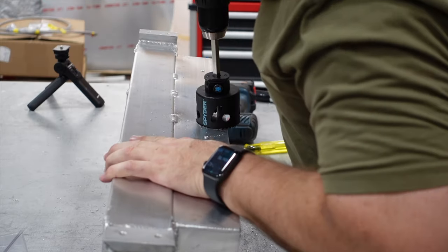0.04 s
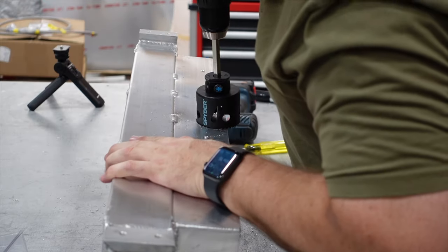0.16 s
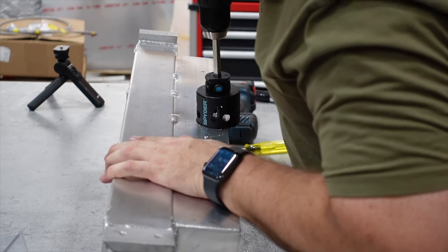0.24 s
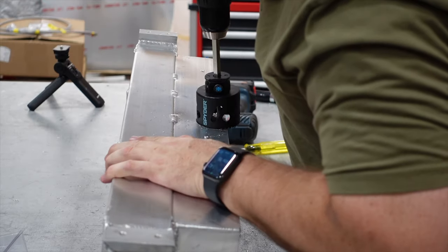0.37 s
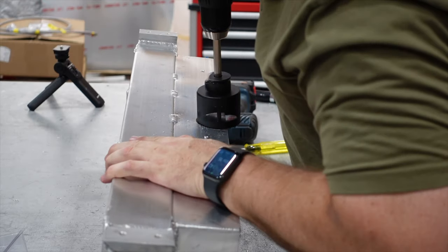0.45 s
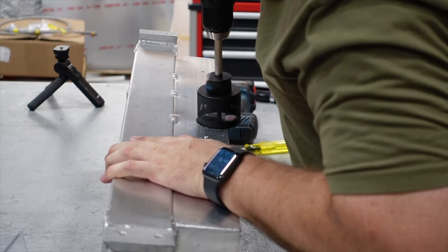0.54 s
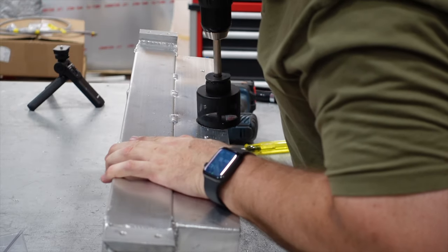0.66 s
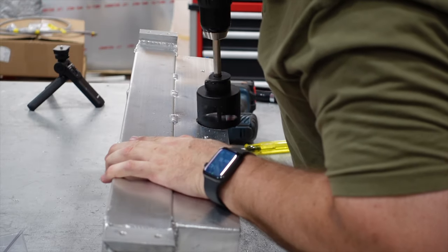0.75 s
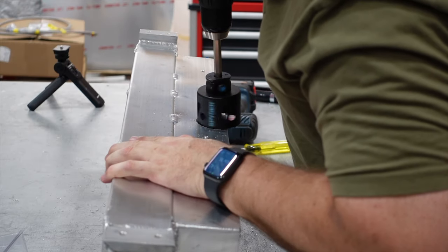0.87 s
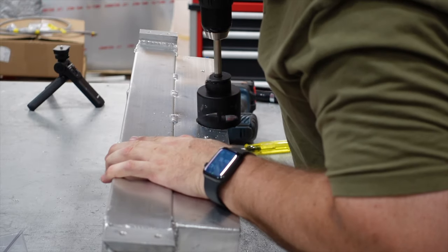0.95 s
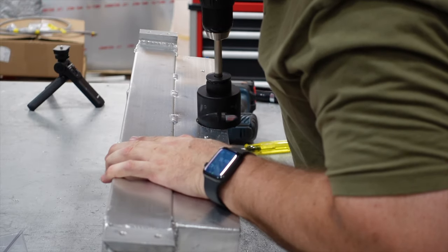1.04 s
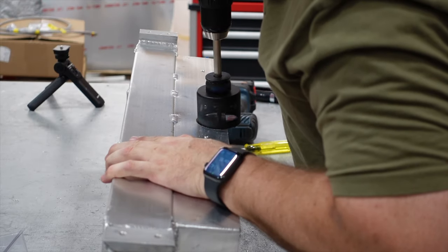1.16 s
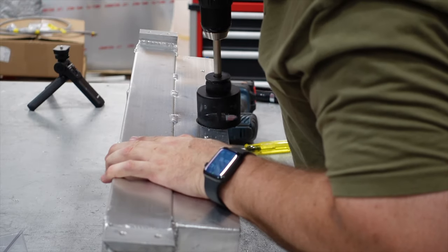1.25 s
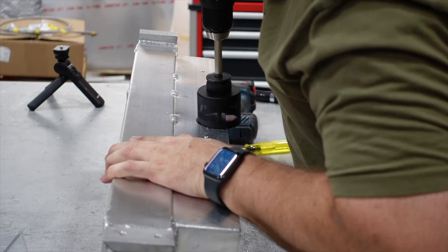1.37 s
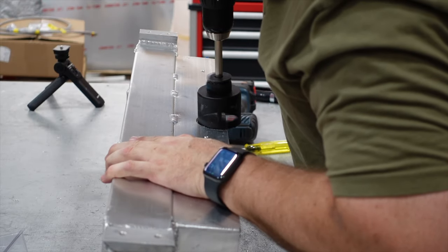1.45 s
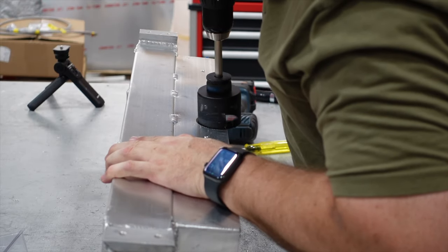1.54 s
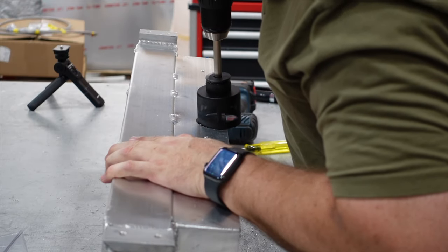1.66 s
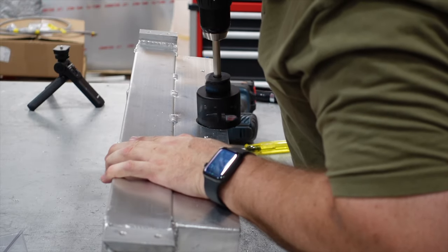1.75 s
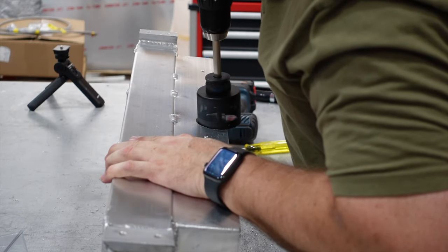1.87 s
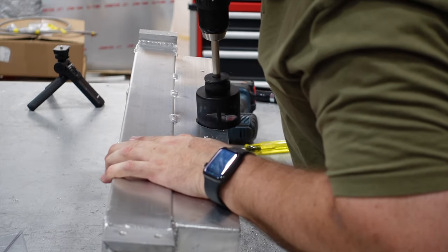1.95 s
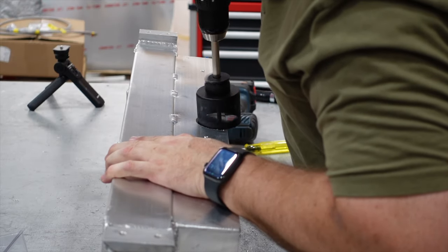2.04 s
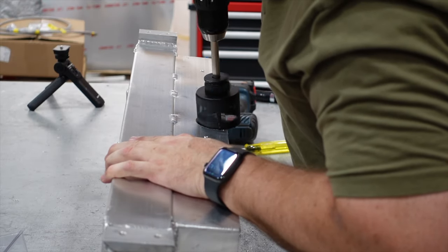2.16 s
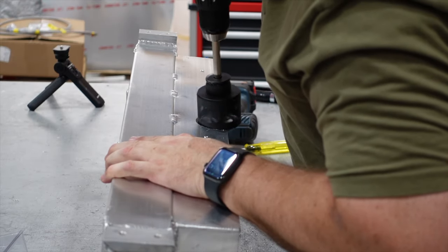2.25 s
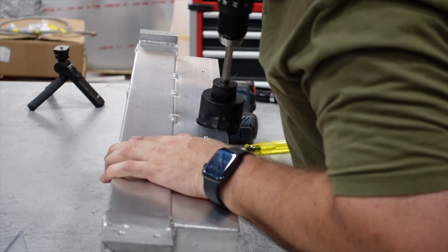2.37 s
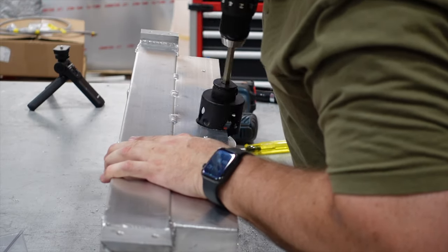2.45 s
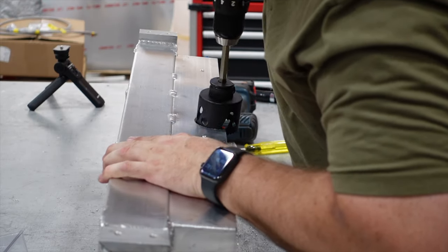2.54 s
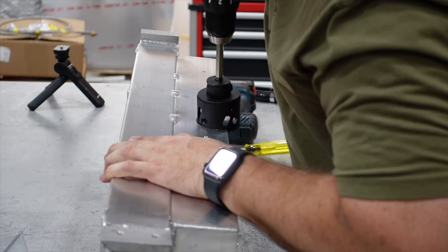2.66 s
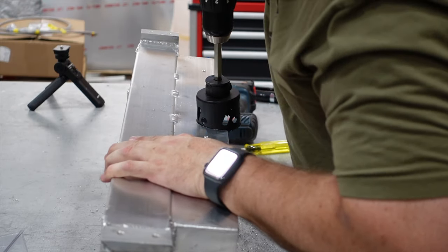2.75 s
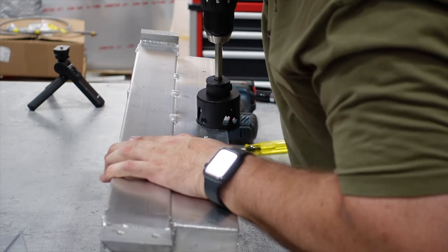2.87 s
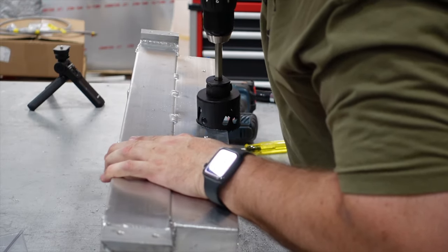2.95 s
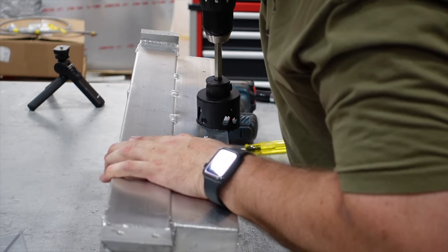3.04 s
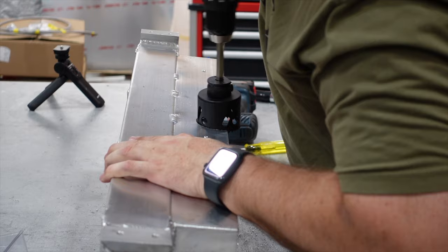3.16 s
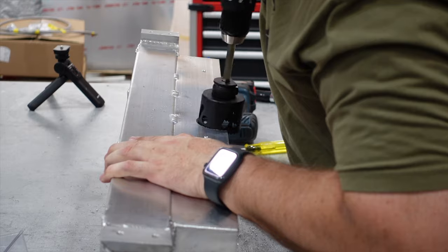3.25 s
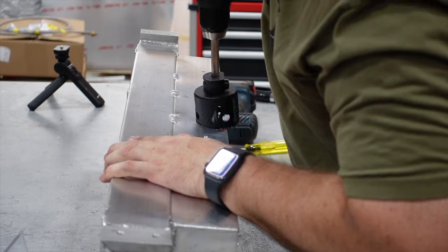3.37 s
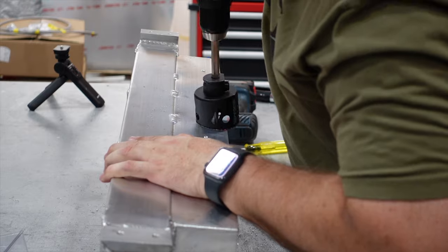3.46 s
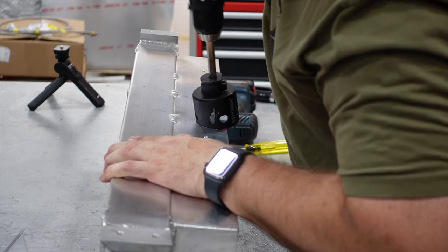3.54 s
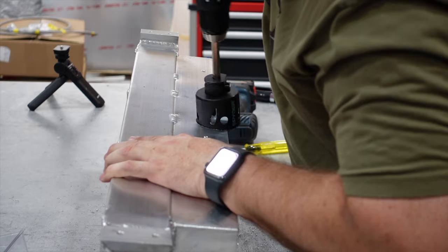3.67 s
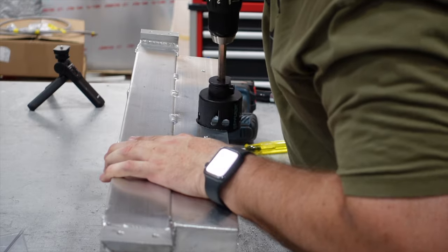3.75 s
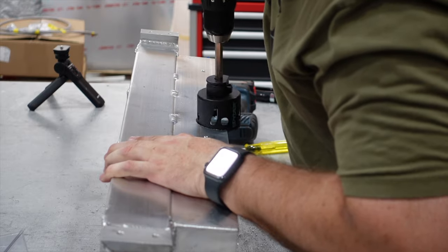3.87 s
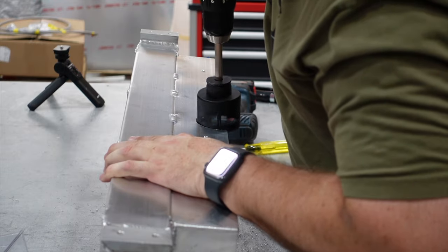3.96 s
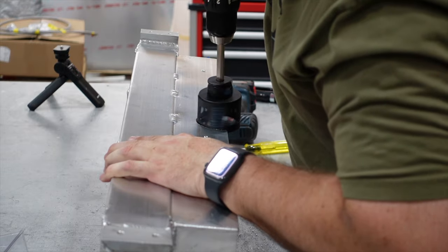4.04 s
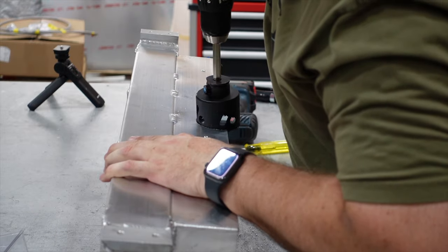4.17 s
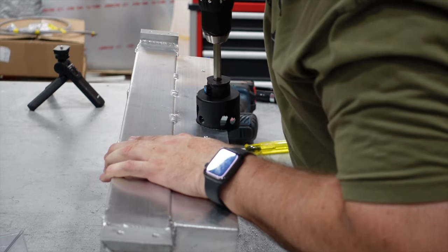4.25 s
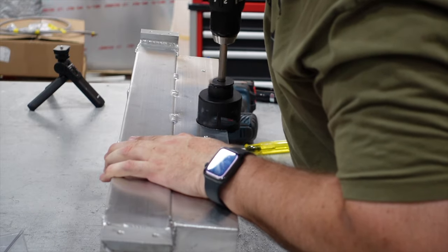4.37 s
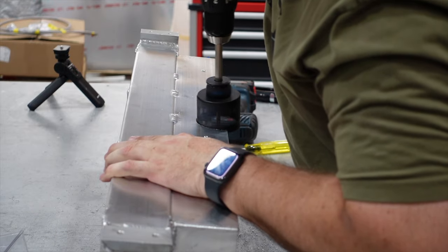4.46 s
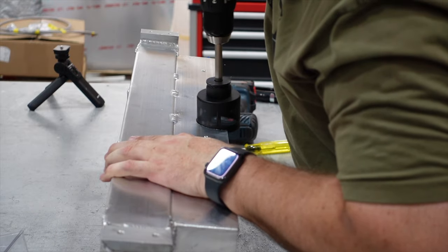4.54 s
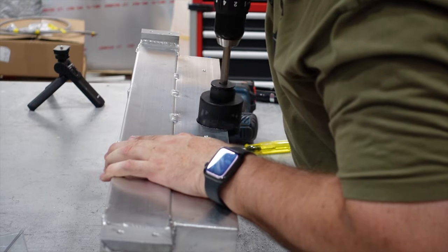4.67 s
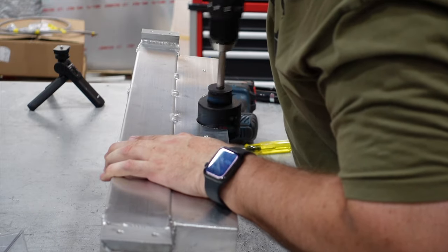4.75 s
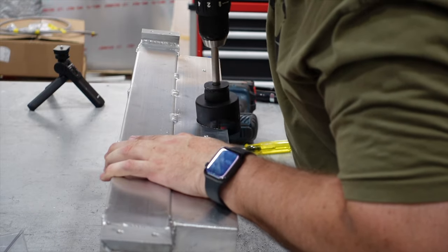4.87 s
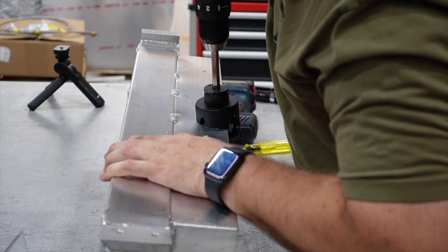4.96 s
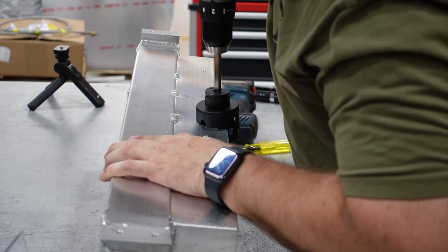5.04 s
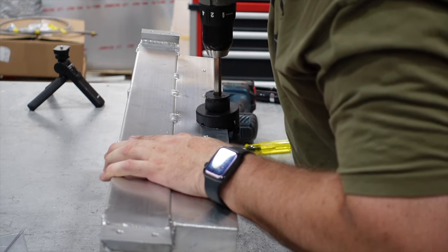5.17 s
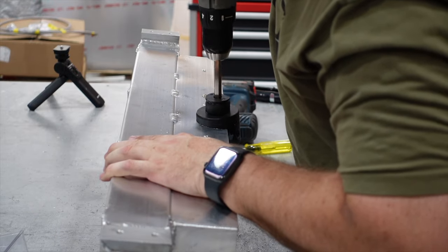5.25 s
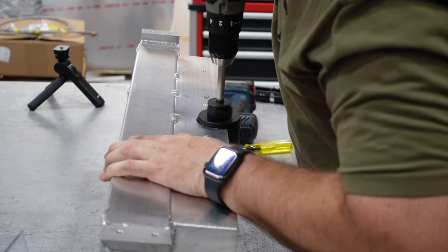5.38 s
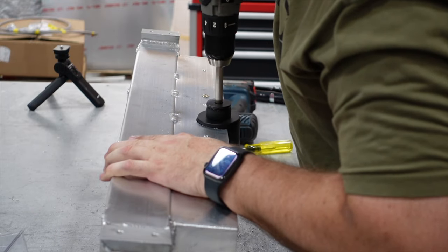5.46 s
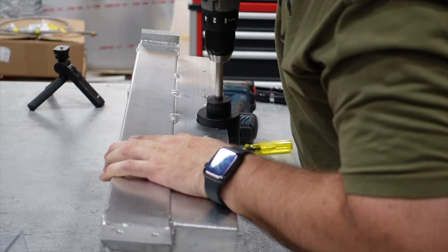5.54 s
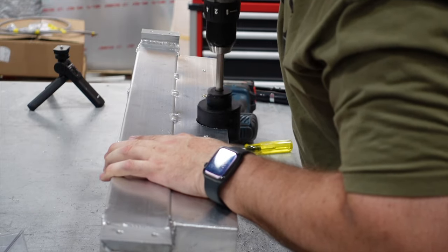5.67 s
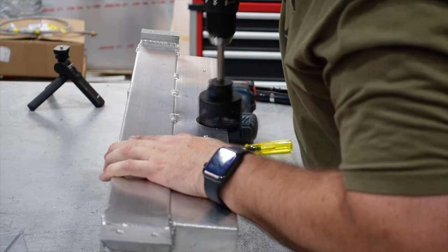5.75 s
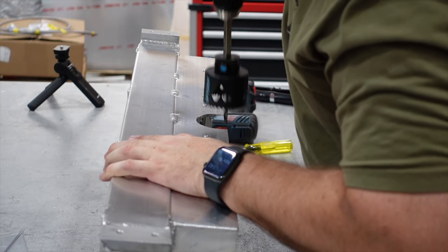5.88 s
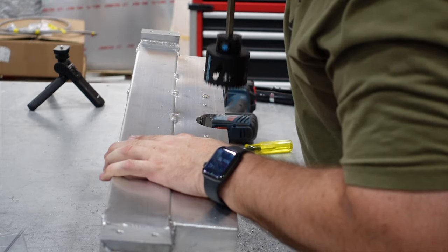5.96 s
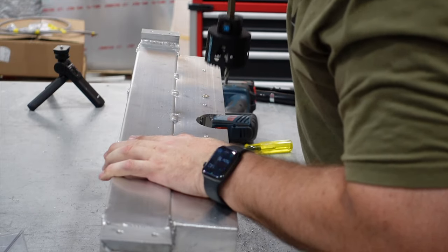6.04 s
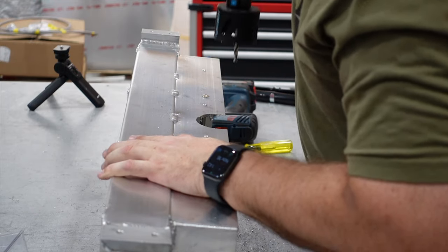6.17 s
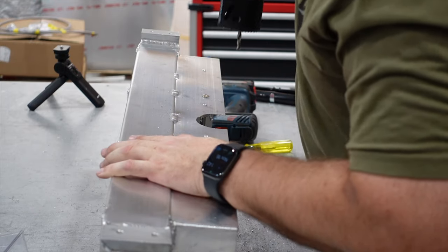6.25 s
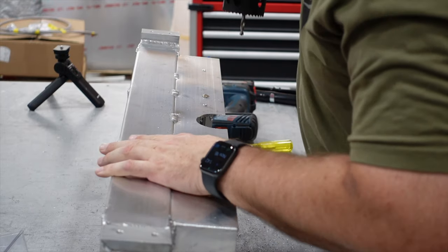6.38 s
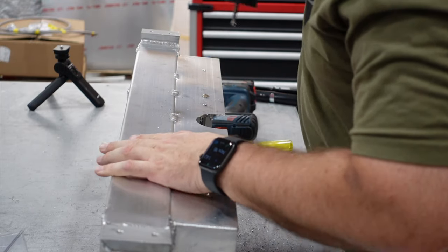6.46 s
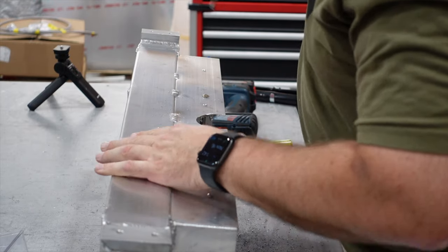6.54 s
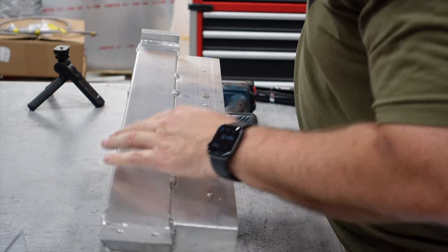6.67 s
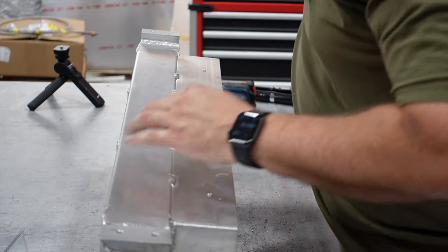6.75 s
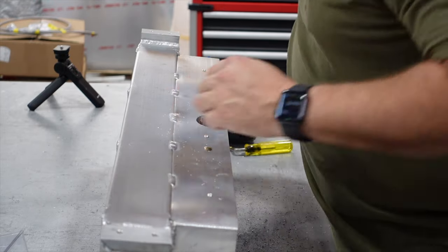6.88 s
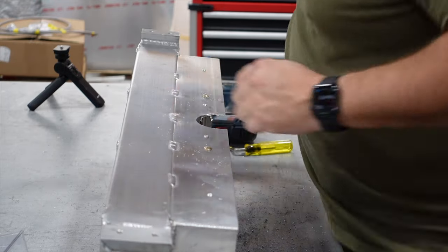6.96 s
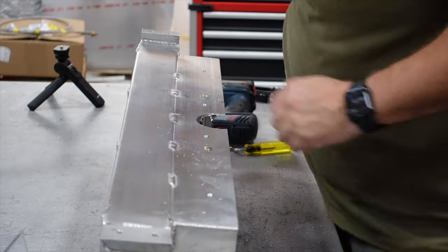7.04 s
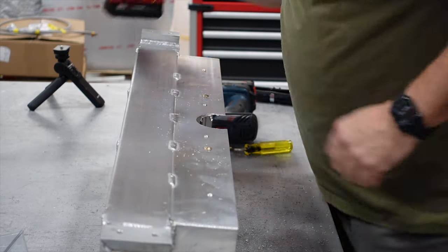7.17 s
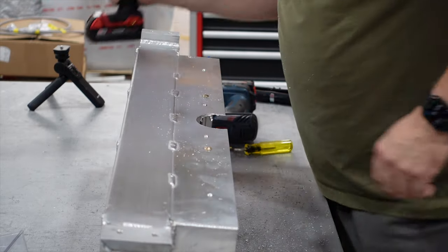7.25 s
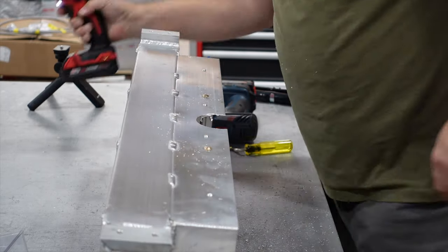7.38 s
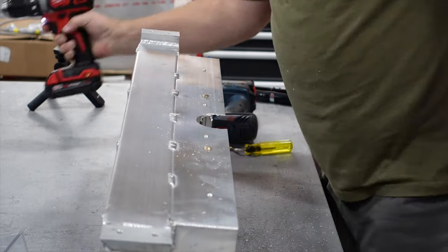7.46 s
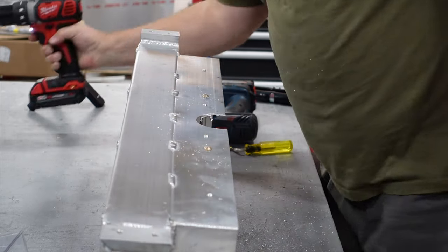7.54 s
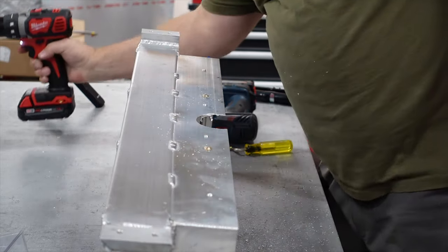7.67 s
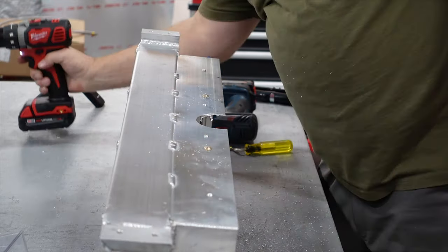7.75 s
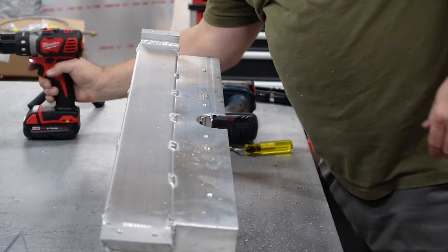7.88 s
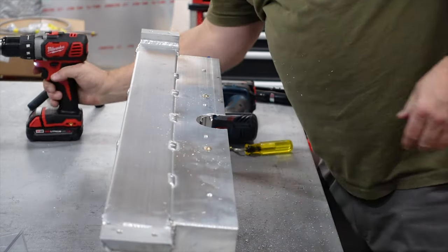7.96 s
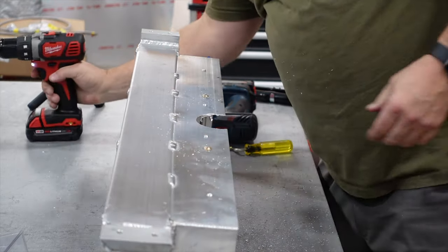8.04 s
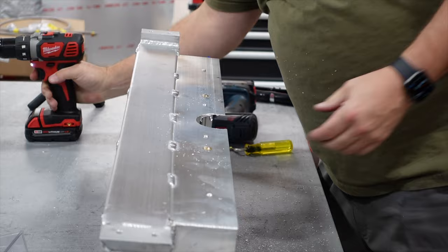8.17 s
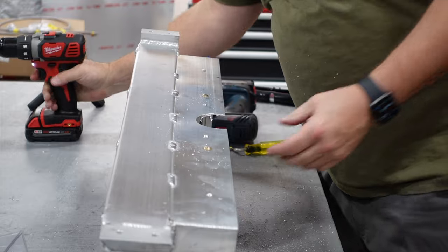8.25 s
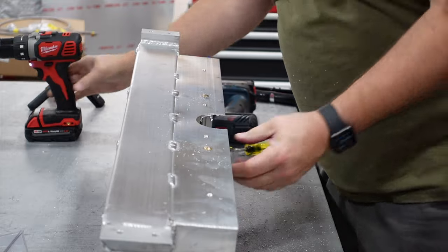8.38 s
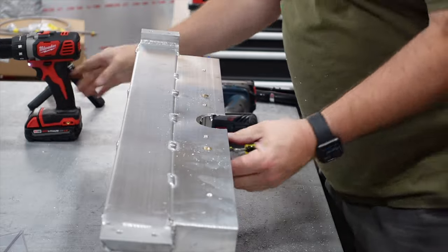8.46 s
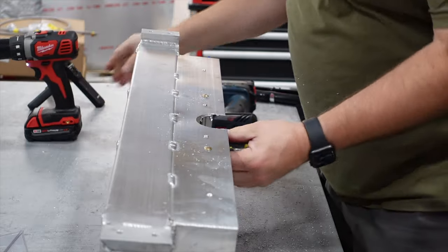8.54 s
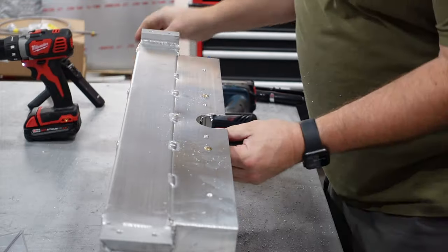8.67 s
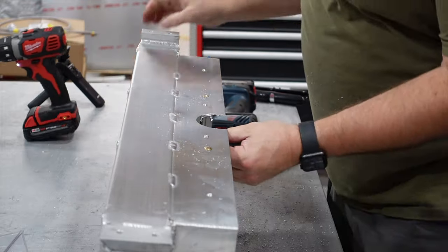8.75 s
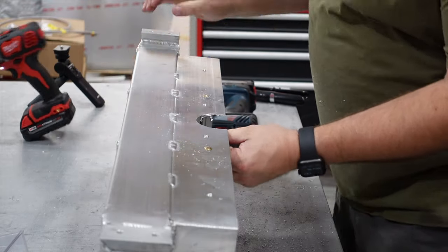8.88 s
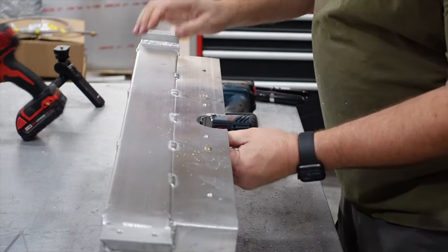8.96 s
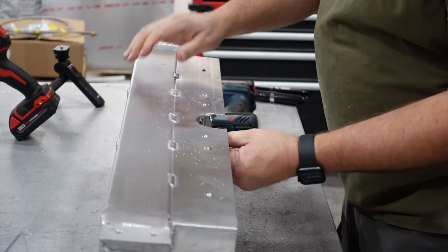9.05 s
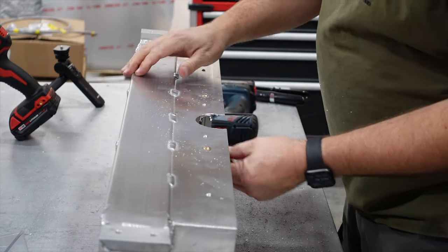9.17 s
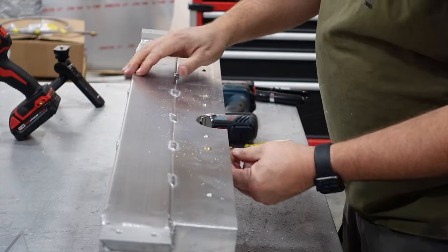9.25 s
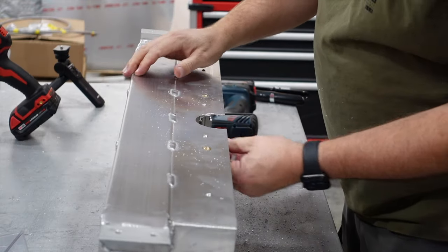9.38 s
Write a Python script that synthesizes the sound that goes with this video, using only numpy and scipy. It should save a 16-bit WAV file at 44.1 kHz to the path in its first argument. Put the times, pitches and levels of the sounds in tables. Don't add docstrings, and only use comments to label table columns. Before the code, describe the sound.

Close up in a hard, echoing workshop, the fading tail of an earlier knock and two tiny clicks lead to harsh grinding at about 0.45 s. Hole saw teeth chatter and screech through thin aluminium until 2.5 s, catching with sharp cracks while the hollow box groans and rings. At 2.75 s a crack and bright slug clinks tumble away, with rustling, and dull bench knocks at 3.2-3.4 s. Small ticks follow. Cutting resumes at 3.9 s, with violent jerky bites from 4.3 to 4.9 s. After a short gap and clicks, stuttering bites and a thin motor whine at 5.35-5.8 s end in a loud break-through. The freed cup sings bell-like, wavering and fading past 7 s. Soft rustles lead to the drill's clunk and scrape around 7.85-8.1 s, faint movement, then a heavy, rattling tip-over at 9.0-9.1 s.

```python
import sys
import numpy as np
from scipy import signal
from scipy.fft import rfft, irfft, next_fast_len
from scipy.io import wavfile

SR = 44100
rng = np.random.default_rng(int(sys.argv[2]) if len(sys.argv) > 2 else 0)


def file_out(sig):
    cols = np.atleast_2d(sig).T
    lim = np.clip(cols, -1, 1)
    pcm = np.round(lim * 32767).astype(np.int16)
    wavfile.write(sys.argv[1], SR, pcm)


def undo_db(level):
    steps = np.asarray(level, float) / 20
    return 10 ** steps


N = 414981
TIME = np.arange(N) / SR
STEPS = TIME[::32]
# (f/Hz, width/Hz, level/dB)
BENCH_MODES = [(48, 25, -7), (95, 14, 17.5), (164, 22, -4), (215, 40, -10.5), (317, 19, -10.5),
               (430, 23, -23.5)]


def unit(x):
    return x / np.sqrt(np.mean(x ** 2) + 1e-20)


def along(points, hz):
    f, v = np.transpose(points)
    return np.interp(np.log(hz + 1), np.log(f + 1), v)


def wobble(rate):
    knots = rng.standard_normal(int(N * rate / SR) + 4)
    return np.interp(TIME * rate, np.arange(len(knots)), knots)


def filtered(x, response):
    m = next_fast_len(N + SR)
    return irfft(rfft(x, m) * response(np.fft.rfftfreq(m, 1 / SR)), m)[:N]


def coloured(x, spectrum):
    return unit(filtered(x, lambda hz: undo_db(along(spectrum, hz))))


def resonant(modes):
    return lambda f: sum(undo_db(db) * 1j * f * w / (c * c - f * f + 1j * f * w) for c, w, db in modes)


def band(x, lo_hz, hi_hz):
    edges = [lo_hz, min(hi_hz, SR / 2.2)]
    return signal.sosfilt(signal.butter(2, edges, "band", fs=SR, output="sos"), x)


def bursts(times, levels_db, t60s):
    t = TIME[:SR // 4]
    out = np.zeros(N + len(t))
    for s, db, t60 in zip(times, levels_db, t60s):
        shape = undo_db(db - 60 * t / t60) * (1 - np.exp(-t / 0.0022))
        out[round(s * SR):][:len(t)] += shape * rng.standard_normal(len(t))
    return out[:N]


def ringing(hits, modes, scatter_db, restart=False):
    out = np.zeros(N)
    for s, db in hits:
        luck = rng.standard_normal((len(modes), 2))
        start = max(round(s * SR), 0)
        if restart:
            out[start:] = 0
        for (hz, level, t60), (size, turn) in zip(modes, luck):
            t = TIME[start:start + int(t60 * SR)] - s
            fading = undo_db(db + level + scatter_db * size - 60 * t / t60)
            out[start:start + len(t)] += fading * np.sin(2 * np.pi * hz * t + 3 * turn)
    return out


def teeth(rate, spread_db):
    torn = rng.random(N) < rate / SR
    return torn * undo_db(spread_db * rng.exponential(size=N)) * rng.standard_normal(N)


def summed_db(levels_db):
    power = np.sum(undo_db(levels_db) ** 2, axis=0)
    return np.interp(TIME, STEPS, 10 * np.log10(power + 1e-14))


def earlier():
    dull = band(rng.standard_normal(N), 650, 1500) + undo_db(-11.5) * band(rng.standard_normal(N), 3300, 5000)
    boom = band(rng.standard_normal(N), 80, 230)
    return undo_db(-32.0 - 60 * TIME / 0.58) * dull + undo_db(-36 - 60 * TIME / 1.8) * boom


def strokes():
    # (peak t/s, length/s, rustle level/dB, bench rumble level/dB)
    swells = [(0.444, 0.19, -44, -41), (2.79, 0.31, -36, -46), (2.906, 0.1, -25.5, -50),
              (2.973, 0.3, -32, -54), (3.215, 0.37, -47, -38), (3.42, .25, -39, -38), (3.32, .12, -46, -44),
              (3.62, .5, -46, -60), (2.775, .12, -24, -55), (2.64, .5, -70, -35), (3.61, 0.89, -65.5, -38),
              (3.844, 0.27, -68, -45), (7.1, 0.66, -66, -74), (7.259, .3, -61, -68.5),
              (7.348, 0.59, -52.5, -75), (7.44, 0.78, -49, -66), (8.315, 0.87, -67, -51),
              (8.536, 0.58, -66.5, -50.5), (8.68, 0.8, -73, -53)]
    rise, depth_db = 0.22, 39.5
    s, length, rustle_db, rumble_db = np.transpose(swells)[:, :, None]
    away = np.maximum((s - STEPS) / rise, (STEPS - s) / (1 - rise)) / length
    return summed_db(rustle_db - depth_db * away), summed_db(rumble_db - depth_db * away)


def background():
    # (f/Hz, level/dB)
    cloth = [(240, -27.5), (500, -9.5), (1000, -5), (2000, -1.5), (3500, -2.5), (5000, -12), (9000, -24.5),
             (15000, -56.5)]
    # (f/Hz, level/dB)
    air_colour = [(15, -14.5), (30, 3), (90, -1), (170, -10), (300, -20), (800, -24), (2000, -25),
                  (4000, -37.5), (8000, -44), (16000, -51)]
    rustle_db, rumble_db = strokes()
    rustle = undo_db(rustle_db - 4 + 1.5 * wobble(25)) * coloured(teeth(rate=5800, spread_db=0.5), cloth)
    sliding = unit(band(filtered(rng.standard_normal(N), resonant(BENCH_MODES)), 20, 1100))
    rumble = undo_db(rumble_db - 1 + 1.6 * wobble(6.8)) * sliding
    air = undo_db(-61.5 + 1.5 * wobble(15)) * coloured(rng.standard_normal(N), air_colour)
    return rustle + rumble + air


def motor():
    # (t/s, end t/s, level/dB)
    half_pressed = [(3.16, 3.245, -61), (3.894, 3.94, -62), (4.261, 4.33, -65), (5.29, 5.362, -58.5)]
    # (t/s, f/Hz, level/dB)
    rotor = [(5.42, 9400, -64), (5.48, 9600, -52), (5.53, 10400, -48.5), (5.6, 10850, -48),
             (5.69, 11000, -48), (5.72, 10800, -49), (5.78, 10900, -50), (5.82, 11020, -64.5)]
    gate = sum(undo_db(db) * np.clip(np.minimum(TIME - a, b - TIME) / .012, 0, 1) for a, b, db in half_pressed)
    whine = gate * undo_db(3.5 * wobble(60)) * np.sin(2 * np.pi * 15350 * TIME + 1.7 * wobble(150))
    s, hz, db = np.transpose(rotor)
    spin = 2 * np.pi * np.cumsum(np.interp(TIME, s, hz) + 40 * wobble(32)) / SR
    gears = unit(band(rng.standard_normal(N), 1560, 1680))
    whistle = undo_db(2.45 * wobble(56)) * (np.sin(spin) + undo_db(5) * np.sin(spin / 2))
    return whine + undo_db(np.interp(TIME, s, db, -140, -140)) * (whistle + undo_db(16.5) * gears)


def ticks():
    # (t/s, level/dB)
    tick_hits = [(3.282, -50), (3.301, -46), (3.585, -55), (3.594, -50), (3.617, -49), (3.663, -51),
                 (3.68, -60), (3.831, -62), (3.901, -57), (3.44, -52), (7.858, -50), (7.874, -54),
                 (7.969, -46), (8.037, -44), (8.148, -60), (4.318, -42), (4.329, -40)]
    s, db = np.transpose(tick_hits)
    ring = ringing([(3.265, -58), (3.4, -56), (3.617, -69)],
                   [(13120, 0, .15), (14000, -2, .1)], scatter_db=-1.0)
    ring += ringing([(7.864, -66), (7.995, -56)],
                    [(9800, 0, .25), (10900, 2, .1), (12150, 0, .2), (14900, 0, .12)], scatter_db=1.5)
    return band(bursts(s, db + 4, np.full(len(s), .012)), 2500, 16000) + ring


def skid():
    # t/s, end t/s, level/dB, treble level/dB
    slide = (7.987, 8.08, -36, -51)
    s, end, db, treble_db = slide
    gate = np.clip(np.minimum(TIME - s, end - TIME) / 0.0063, 0, 1) * undo_db(3 * wobble(90))
    scrape = gate * unit(teeth(rate=3000, spread_db=1.5))
    return undo_db(db) * band(scrape, 900, 3500), undo_db(treble_db) * band(scrape, 6500, 15000)


def bench():
    # (t/s, peak level/dB, clatter/dB,
    # treble/dB, t60/s)
    thuds = [(3.238, -23, -4, -15, 0.26), (3.346, -18, -3, -17, 0.16), (3.36, -14, -10.5, -17.5, 0.19),
             (3.38, -18.5, -3, -24, 0.13), (7.853, -23.5, -13, -34, 0.28), (7.968, -13.5, -18, -39.5, 0.13),
             (7.985, -16.5, -6, -22.5, 0.14), (8.011, -15, -4, -25, 0.094), (8.034, -24.5, 0, -17, 0.13),
             (8.055, -22.5, -7.5, -20, 0.17), (9.017, -7, -4.5, -18, 0.14), (9.033, -5, -6.5, -20, 0.098),
             (9.061, -10, -3.5, -16, 0.13), (9.081, -9.5, -6, -17, 0.082), (9.107, -17.5, -7, -20, 0.17)]
    # (t/s, level/dB)
    rail_hits = [
        (7.862, -68),
        (9.034, -43),
        (9.107, -50),
    ]
    # (level/dB, t60/s)
    rail_hz = [6702, 7074, 8650, 10350, 10520]
    rail = [(-6, 0.84), (-10, .7), (5, 0.24), (-2, 0.3), (2, 0.36)]
    s, db, clatter_db, treble_db, t60 = np.transpose(thuds)
    blows = np.bincount(np.round(s * SR).astype(int), undo_db(db + 31), N)
    push = band(filtered(blows, resonant(BENCH_MODES)), 23, 500) + band(bursts(s, db + 11.5, t60), 63, 450)
    clatter = band(band(bursts(s, db + clatter_db + 8.5, t60 * 1.1), 630, 3400), 300, 3400)
    edge = band(bursts(s, db + treble_db + 4.0, t60 * .4), 3800, 12000)
    return push + edge + ringing(rail_hits, np.column_stack([rail_hz, rail]), scatter_db=3), clatter


def jolts():
    # (t/s, f/Hz, level/dB, t60/s)
    jolt_notes = [(2.761, 976, -19, 0.11), (3.24, 91.9, -23.5, 0.28), (3.309, 92, -22.5, 0.34),
                  (3.352, 89, -30, 0.4), (3.579, 95, -33, 0.44), (5.349, 215, -14, 0.13),
                  (5.784, 1038, -33, 1.2), (5.785, 887, -37, 0.4), (5.786, 1783, -43, 1.6),
                  (5.785, 1855, -52, 0.9), (7.853, 215, -12.5, 0.067), (7.971, 138, -8.5, 0.064),
                  (7.988, 104.5, -9, 0.12), (9.017, 313, -2.5, 0.044), (9.03, 124.4, -12, 0.19),
                  (9.076, 205, -23, 0.092), (9.112, 153.5, -21, 0.075),
                  (0.8, 288, -21.5, 0.34), (0.84, 360, -16, 0.34), (1.499, 345, -22.5, 0.67),
              (4.449, 342, -23, .3), (5.359, 328, -25, .2), (2.45, 332, -17.5, 0.7),
              (2.46, 301, -21.5, 0.7), (4.92, 335, -26, 0.9), (5.63, 201, -31, 0.28),
              (0.855, 340, -13, 0.1), (4.112, 347, -16.5, 0.078), (4.152, 109, -15.5, .1),
              (4.42, 370, -13, .13), (4.5, 366, -19.5, .12), (4.565, 364, -13.5, 0.16),
              (4.317, 140, -24, .15), (5.365, 260, -16, 0.099), (5.64, 1540, -14.5, 0.076),
              (2.8, 875, -28.5, 0.24), (2.84, 942, -31.5, 0.19), (5.8, 467, -25.5, 1.35),
              (5.46, 210, -27, .5), (5.83, 310, -24, .2), (3.24, 950, -31, .14), (8.2, 330, -46, 1.2),
              (8.64, 330, -55, .5), (5.8, 1055, -33, 1.2), (8.011, 1280, -27.5, 0.18),
              (8.04, 1246, -30, 0.19), (2.53, 318.5, -23, 0.29), (2.59, 309, -27, 0.2),
              (3.982, 350, -15, .1), (4.005, 330, -16, .12), (4.03, 400, -18, .1), (2.765, 1010, -22, .16),
              (2.77, 2350, -24, .1), (3.3, 330, -36, .15), (3.29, 480, -38, .12), (3.37, 250, -24, .1),
              (3.59, 175, -36, .1), (9.03, 1420, -22, .14), (9.075, 1430, -20, .1), (5.782, 2650, -17, .08),
              (3.6, 745, -52, .7)]
    # (t/s, level/dB)
    let_go = [
        (2.49, -23.5),
        (4.94, -29),
        (5.787, -36),
    ]
    # (f/Hz, level/dB, t60/s)
    panel = [(467, -0.5, 0.85), (168, -21.5, 1.2)]
    # (t/s, level/dB, t60/s)
    linger_hz = [1841, 5071, 1841, 2686, 4348, 1846, 2686]
    linger = [(2.76, -33.5, 2.4), (2.78, -49, 1.5), (4.928, -39, 2.3), (8.0, -63, 4.5), (8.0, -70, 2),
              (9.029, -35, .55), (9.1, -59, 4)]
    released = [(s, hz, db + level, t60) for s, db in let_go for hz, level, t60 in panel]
    lingering = [(s, hz, db, t60) for hz, (s, db, t60) in zip(linger_hz, linger)]
    out, waver = np.zeros(N), undo_db(1.5 * wobble(25))
    for s, hz, db, t60 in jolt_notes + released + lingering:
        t = TIME[:int(t60 * SR)][:N - round(s * SR)]
        swell = 1 - np.exp(-t * hz / 0.5)
        out[round(s * SR):][:len(t)] += undo_db(db - 60 * t / t60) * swell * np.sin(2 * np.pi * hz * t)
    return out * waver


def split_notes():
    # (t/s, level/dB, t60/s, beats per s)
    split_hz = [4613, 4613, 2772, 1841, 161]
    split = [(4.93, -39, 1.7, 23), (5.415, -39.5, 2, 17), (9.02, -45, 4, 1.6), (3.36, -46, 1.5, 6),
             (5.8, -50, 3.6, 12.2)]
    silent_s = [5.16, 5.53, 8.95, 3.5, 6.075]
    twins_db = [-9, -8, -12, -8, -1]
    out = np.zeros(N)
    for hz, (s, db, t60, beat), silent, twin_db in zip(split_hz, split, silent_s, twins_db):
        turn = 2 * np.pi * (TIME - silent)
        pair = np.sin(hz * turn) - undo_db(twin_db) * np.sin((hz + beat) * turn)
        out += (TIME > s) * undo_db(db - 60 * np.abs(TIME - s) / t60) * pair
    return out * undo_db(1.5 * wobble(4.4))


def swinging_note():
    # (t/s, level/dB)
    swing = [(6.048, -64), (6.5, -48), (6.63, -47), (6.84, -56), (6.93, -68), (7.12, -62), (7.2, -69),
             (7.6, -70), (7.84, -84), (9.02, -77)]
    s, db = np.transpose(swing)
    level = np.sqrt(2) * undo_db(np.interp(TIME, s, db, -140, -140))
    return level * np.sin(2 * np.pi * 1417 * TIME + .6 * wobble(8))


def steel():
    # (t/s, peak level/dB)
    slug_hits = [(2.7601, -7), (2.825, -13), (2.8944, -18), (2.9102, -21.5), (2.953, -25.5), (2.977, -23),
                 (3.025, -38.5), (3.178, -44)]
    # (level/dB, t60/s)
    slug_hz = [915, 2191, 3397, 5071, 6487, 7660, 8721, 11090, 13070, 13920]
    slug_modes = [(-4.5, 0.14), (-21.5, .3), (-23, .3), (-19.5, .8), (-19, 0.56), (-13, 0.55), (-13, 0.28),
                  (-15, 0.21), (-20, 0.22), (-17.5, .2)]
    # (t/s, peak level/dB)
    pin_hits = [(5.412, -14.5), (5.694, -21.5), (5.9734, -32), (6.0187, -40), (6.052, -50)]
    # (level/dB, t60/s)
    pin_hz = [7330, 10200, 12150, 13120, 14790]
    pin_modes = [(4, 0.14), (-9.5, 0.35), (-12.5, .25), (0, 0.18), (-10.5, .15)]
    # (f/Hz, level/dB, t60/s)
    tear_modes = [(8400, -10, .1), (8560, 4.5, 0.044), (10950, -1, 0.06), (12040, -5, 0.088),
                  (13700, -9, .09)]
    note = swinging_note()
    slug = ringing(slug_hits, np.column_stack([slug_hz, slug_modes]), scatter_db=2.0, restart=True)
    stilled = undo_db(-300 * np.clip(TIME - 3.24, 0, 1))
    pins = ringing(pin_hits, np.column_stack([pin_hz, pin_modes]), scatter_db=4.0)
    clinks = undo_db(-12) * stilled * slug + undo_db(-6.5) * pins
    clinks += ringing([(4.915, -36), (4.93, -27), (4.955, -40)], tear_modes, scatter_db=2.0)
    hits = np.array(slug_hits + pin_hits)
    contacts = band(bursts(hits[:, 0], hits[:, 1] - 5, np.full(len(hits), .03)), 900, 9000)
    return undo_db(4.5 * wobble(45)) * clinks + contacts + note


def rim_notes():
    # (t/s, f/Hz, level/dB)
    rim_low = [(5.79, 4346, -33), (6.03, 4346, -35), (6.15, 4346, -44), (6.26, 4346, -44),
               (6.35, 4345, -54), (6.44, 4343, -51), (6.52, 4342, -66), (6.62, 4341, -55),
               (6.78, 4340, -68), (6.89, 4339, -57), (7.06, 4340, -66), (7.46, 4343, -65),
               (7.84, 4346, -80)]
    rim_high = [(5.79, 4526, -30), (6.03, 4526, -33), (6.14, 4526, -45), (6.25, 4526, -44),
                (6.33, 4525, -57), (6.42, 4523, -54), (6.6, 4520, -69), (6.72, 4519, -60),
                (6.95, 4519, -66), (7.3, 4520, -80), (7.6, 4520, -93)]
    rim_wall = [(5.79, 2643, -34), (5.94, 2643, -30), (6.03, 2643, -42), (6.28, 2643, -43),
                (6.42, 2643, -53), (6.52, 2643, -63), (6.66, 2643, -56), (6.98, 2643, -66),
                (7.3, 2643, -82)]
    out = np.zeros(N)
    for rows in (rim_low, rim_high, rim_wall):
        s, hz, db = np.transpose(rows)
        level = undo_db(np.interp(TIME, s, db, -140, -140) + wobble(12))
        out += level * np.sin(2 * np.pi * np.cumsum(np.interp(TIME, s, hz)) / SR)
    return out


def cup():
    # (t/s, peak level/dB)
    cup_hits = [
        (5.79, -31.5),
    ]
    # (level/dB, t60/s)
    cup_hz = [1507, 1814, 2659, 2686, 2772, 6648, 6778]
    cup_modes = [(-14.5, 2.4), (-11.5, 1.75), (-21, 3.5), (-17.5, 3.9), (-5.5, 1.5), (-10.5, 1.15),
                 (-6.5, 1.1)]
    ring = ringing(cup_hits, np.column_stack([cup_hz, cup_modes]), scatter_db=0)
    return undo_db(1.2 * wobble(11) + wobble(2.8)) * ring


def snags():
    # (t/s, peak level/dB, treble/dB)
    catches = [(0.868, -8, -11.5), (0.895, -8.5, -12), (0.964, -10, -6), (4.374, -2, -14.5),
               (4.568, -3.5, -12.5), (5.474, -12, -12.5), (5.52, -16, -12), (5.56, -12.5, -14.5),
               (5.613, -12.5, -15), (1.212, -9.5, -7), (1.254, -5, -8), (1.339, -5, -15.5),
               (1.628, -3.5, -17), (1.698, -4.5, -8), (1.789, -2.5, -17.5), (1.838, -5.5, -9.5),
               (1.988, -11.5, -11.5), (2.222, 0, -9.5), (2.408, 2, -17), (2.653, -10.5, -23),
               (2.759, -3.5, -14), (3.945, 1, -18.5), (4.347, -0.5, -16), (4.4, 0, -12), (4.424, -7, -8.5),
               (4.505, -5, -4), (4.553, -13, -19.5), (4.739, 0, -14), (4.892, -1, -18), (5.35, -6.5, -14.5),
               (5.414, -4, -13.5), (5.635, -1.5, -13.5), (5.702, -14, -12), (5.784, 6, -13.5)]
    # (t/s, peak level/dB, treble/dB)
    clicks = [(0.36, -46.5, -13), (0.417, -43, -7), (3.59, -35, -40), (3.618, -34.5, -40),
              (3.662, -34.5, -39.5), (3.837, -44, -42), (5.308, -24.5, -22.5), (5.328, -25.5, -13.5),
              (8.549, -56, -19), (8.639, -62, -20), (8.976, -60.5, 4)]
    s, db, treble_db = np.transpose(catches + clicks)
    t60 = np.repeat([0.049, 0.04], [len(catches), len(clicks)])
    crack = band(band(bursts(s, db + 4.5, t60), 700, 4100), 300, 4800)
    return crack, band(bursts(s, db + treble_db - 0.5, t60 * 0.7), 4100, 16000)


def bites():
    # (t/s, end t/s, level/dB, fade after it/(dB/s), screech over the bite/dB)
    bite_rows = [(0.45, 0.835, -15.5, 250, -9.5), (0.845, 0.901, -17.5, 199.5, -18.5),
                 (0.96, 0.99, -21.5, 198, -8.5), (0.979, 1.235, -15.5, 97, -7.5),
                 (1.264, 2.423, -16, 97, -7.5), (2.438, 2.518, -19, 68, -23), (3.932, 4.104, -14, 200, -12),
                 (4.118, 4.157, -16, 121, -19.5), (4.304, 4.342, -26, 198.5, -12.5),
                 (4.336, 4.509, -15.5, 102, -10.5), (4.552, 4.734, -12.5, 300.5, -7.5),
                 (4.748, 4.922, -17, 151, -13.5), (5.341, 5.379, -19, 201.5, -16),
                 (5.404, 5.433, -23.5, 301, -14.5), (5.47, 5.63, -27, 299.5, -14.5),
                 (5.63, 5.676, -26, 399, -13), (5.688, 5.768, -24.5, 300, -12.5),
                 (5.768, 5.82, -18.5, 108.5, -3.5)]
    dig_in_s, from_db, screech_fades = 0.0065, -42, 1.4
    s, end, db, fade, screech_db = np.transpose(bite_rows)[:, :, None]
    since = STEPS - s
    after_db = fade * np.clip(STEPS - end, 0, None)
    held_db = np.where(since > 0, db + from_db * np.exp(-np.abs(since) / dig_in_s), -200)
    return summed_db(held_db - after_db), summed_db(held_db + screech_db - screech_fades * after_db)


def chatter():
    # (f/Hz, drift/Hz, level under the bite/dB)
    locked = [(350, 14, -21), (880, 20, -21), (1295, 32, -14), (1520, 40, -16), (3180, 70, -23)]
    notes = np.zeros(N)
    for hz, drift_hz, db in locked:
        level = undo_db(db + 4.5 * wobble(14) + 2.5 * wobble(60))
        notes += level * np.sin(2 * np.pi * np.cumsum(hz + drift_hz * wobble(18)) / SR)
    return undo_db(bites()[0]) * notes


def saw():
    # (f/Hz, level/dB)
    grind_colour = [(150, -39.5), (300, -7.5), (640, -9.5), (1000, -1), (1400, 0.5), (2200, -2), (3400, -4),
                    (4600, -9), (9000, -24), (16000, -53.5)]
    screech_colour = [(1760, -24), (3000, -5.5), (3560, 4.5), (4700, -10.5), (5120, -6.5), (7640, -12),
                      (12200, -16), (16000, -19), (16500, -44.5)]
    shake_colour = [(15, -57.5), (25, -25), (54, -30), (91, -6), (141, -9), (357, 0.5), (419, -21.5),
                    (466, -1), (600, -8.5), (780, -40), (1320, -120)]
    bite_db, screech_db = bites()
    uneven = 1.0 * wobble(11) + wobble(38)
    passing_db = 1.6 * np.sin(2 * np.pi * np.cumsum(143 + 9 * wobble(6)) / SR)
    chips = coloured(teeth(rate=3500, spread_db=0.5), grind_colour)
    chips = undo_db(bite_db + 0.79 * uneven + passing_db) * chips
    screech = coloured(teeth(rate=9000, spread_db=2.0), screech_colour)
    screech = undo_db(screech_db + 1.0 + 0.19 * uneven + 3.37 * wobble(110)) * screech
    shake = undo_db(bite_db - 11.5 + 2.2 * wobble(20)) * coloured(rng.standard_normal(N), shake_colour)
    return chips + shake, screech


def box(force):
    # (f/Hz, width/Hz, level/dB)
    panels = [(92.5, 30, 2), (164, 1.6, 4.5), (205, 16, 1), (312, 7.8, -5), (374.6, 37, -1.5),
              (469.5, 4.8, 3), (720, 40, -2.5), (889, 56, 0.5), (1074, 13, -0.5), (1268, 70, -2),
              (1530, 140, -7), (1615, 29, -0.5), (1358, 20, -3), (1900, 25, -4), (2330, 50, -2.5),
              (2460, 16, -3.5), (2570, 14, -4), (2938, 27, -1.5), (3055, 25, -0.5), (3440, 30, -1.5),
              (3220, 250, -6)]
    sets = [filtered(force * undo_db(4 * wobble(9)), resonant(panels[k::3])) for k in range(3)]
    return undo_db(-3.0) * (force + sum(sets))


def blade(rim):
    # (f/Hz, width/Hz, level/dB)
    rim_modes = [(4500, 110, 2.5), (5020, 510, 3.5), (5960, 100, 1.5), (6900, 350, 3.5), (8460, 1100, 4.5),
                 (9820, 510, -4), (10900, 1500, 1.5), (12100, 690, 1), (14700, 400, -2.5),
                 (15550, 350, -2.5)]
    return undo_db(-3.5) * (rim + filtered(rim, resonant(rim_modes)))


def shop(x):
    # (f/Hz, t60/s)
    decay = [(100, 0.76), (500, 0.73), (2000, 0.9), (5000, 0.79), (10000, 0.53), (16000, 0.33)]
    # (f/Hz, level/dB)
    wall_colour = [(60, -3), (300, -0.5), (2000, -0.5), (5000, -1), (10000, -6.5), (16000, -9)]
    x = filtered(x, lambda hz: undo_db(along(wall_colour, hz)))
    hz, t, z = signal.stft(rng.standard_normal(SR + SR // 2), SR, nperseg=256)
    tail = signal.istft(z * undo_db(-60 * t / along(decay, hz)[:, None]), SR, nperseg=256)[1]
    return signal.fftconvolve(np.pad(x, (400, 0)), tail / np.linalg.norm(tail))[:N]


def scene():
    grind, screech = saw()
    crack, edge = snags()
    thud, clatter = bench()
    drag, rasp = skid()
    near = box(grind + crack + clatter + drag + earlier()) + blade(screech + edge + rasp)
    near += steel() + thud + jolts() + chatter()
    free_notes = split_notes() + rim_notes() + cup()
    return (near + undo_db(-9.5) * shop(near) + free_notes + ticks() + motor() + background())[None]


def band_limit(x):
    return signal.sosfilt(signal.butter(12, 16990, fs=SR, output="sos"), x)


def record(dry):
    held = dry[0] / (1 + np.abs(dry[0] / 0.67) ** 3.0) ** (1 / 4.0)
    top_hz, edge_hz = 15850, 200
    limited = filtered(held, lambda hz: np.clip((top_hz - hz) / edge_hz, 0, 1) ** 2)
    return band_limit(limited[None])


dry = scene()
out = record(dry)
file_out(out)
```